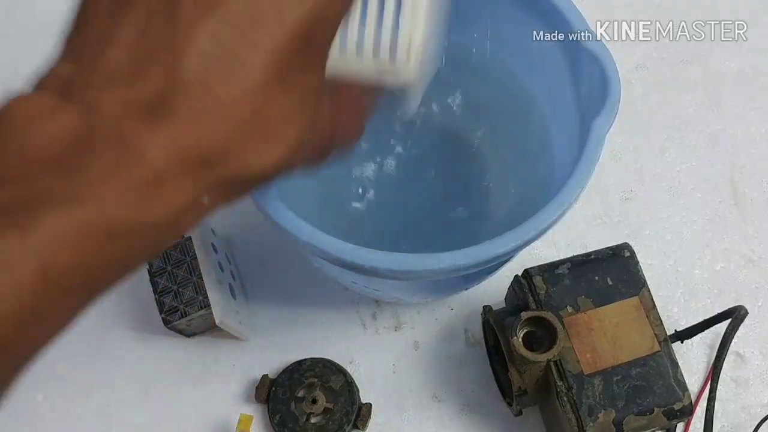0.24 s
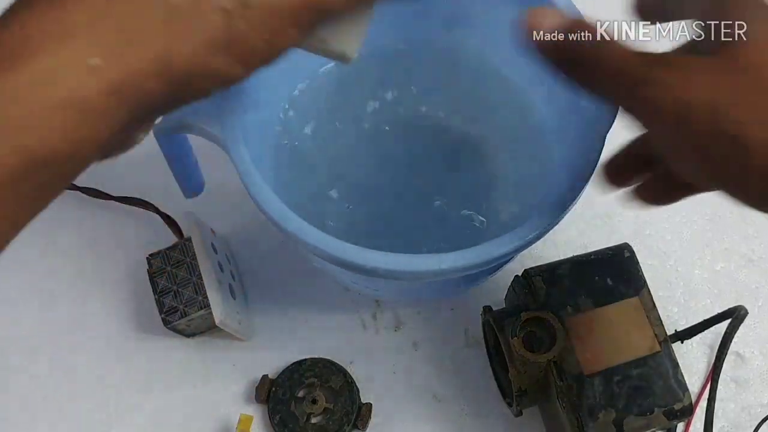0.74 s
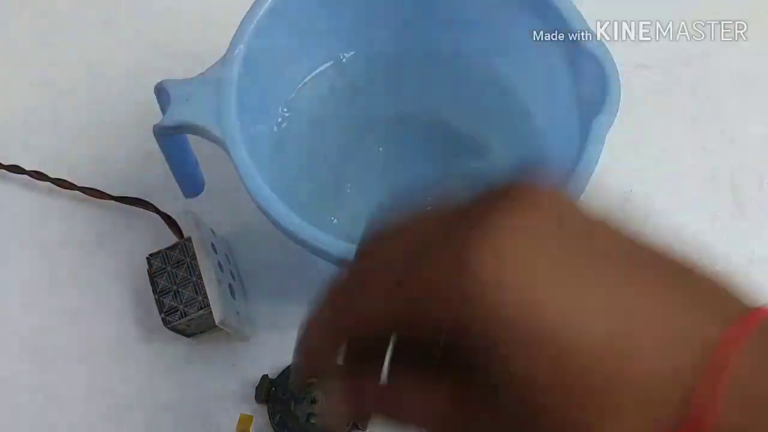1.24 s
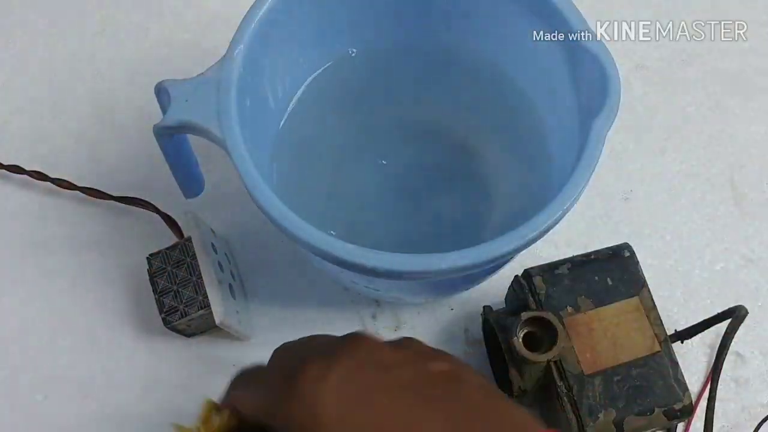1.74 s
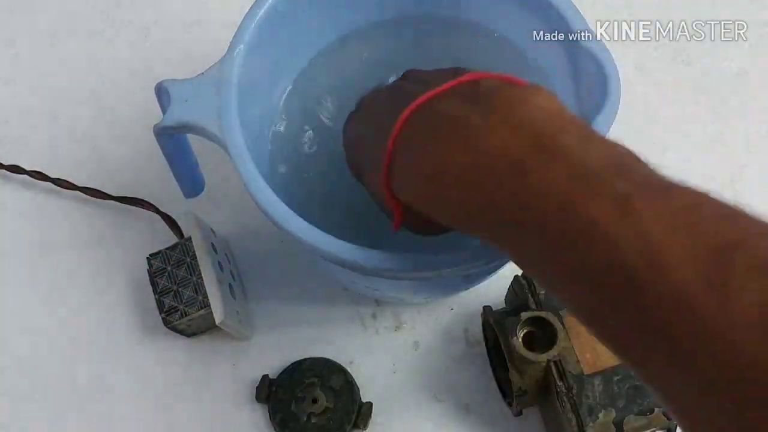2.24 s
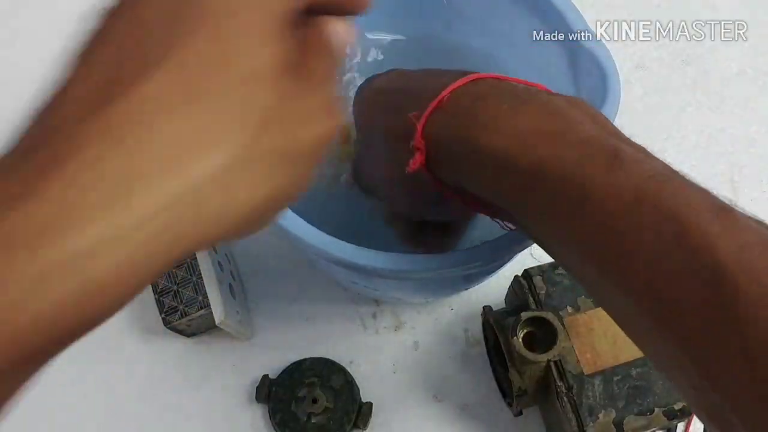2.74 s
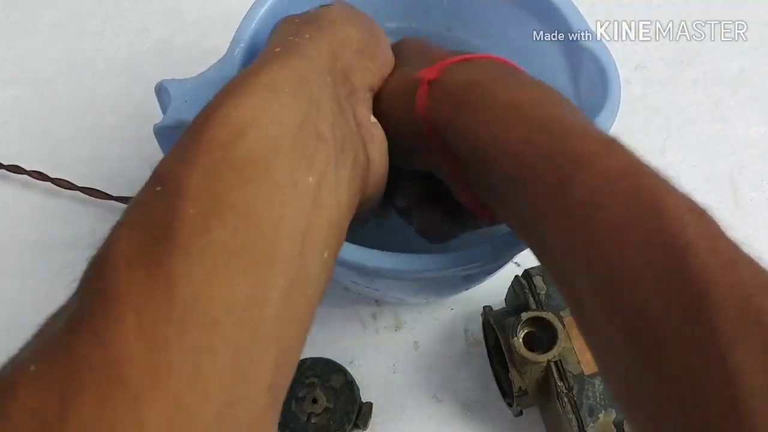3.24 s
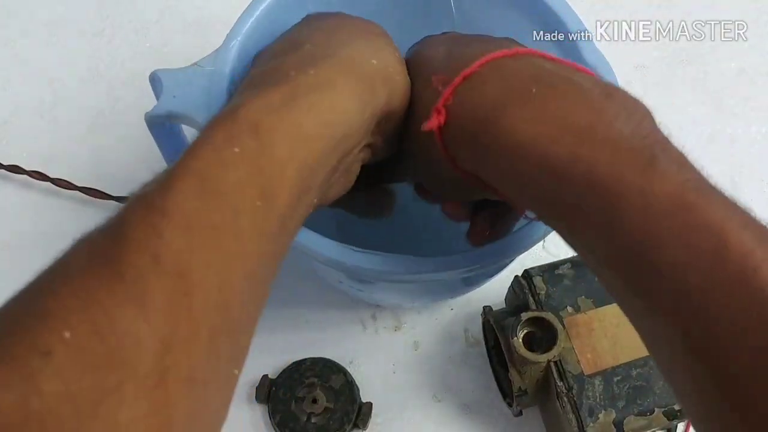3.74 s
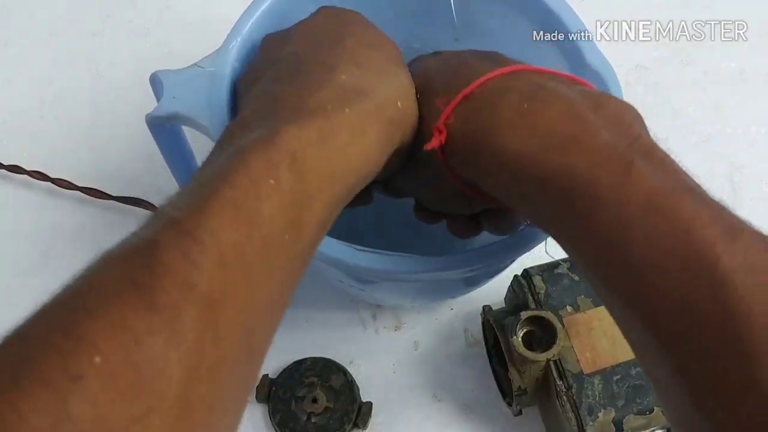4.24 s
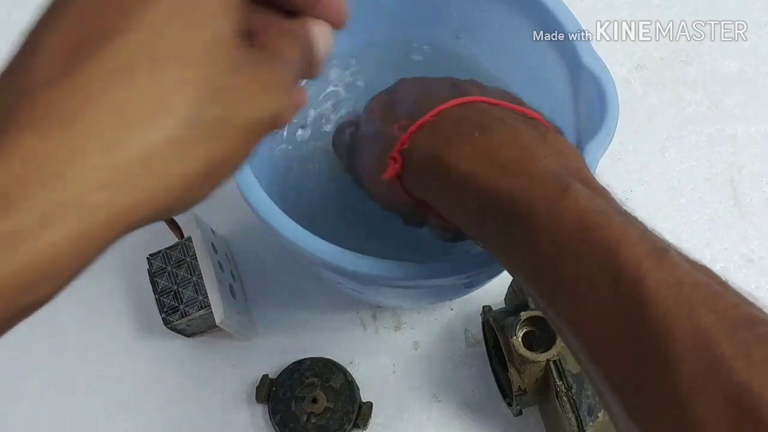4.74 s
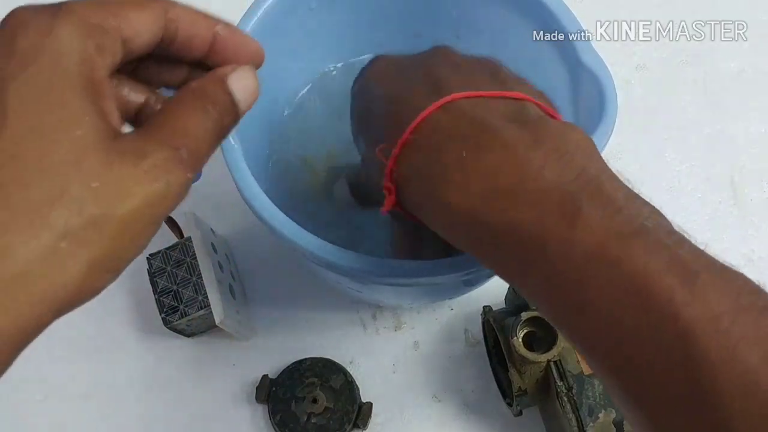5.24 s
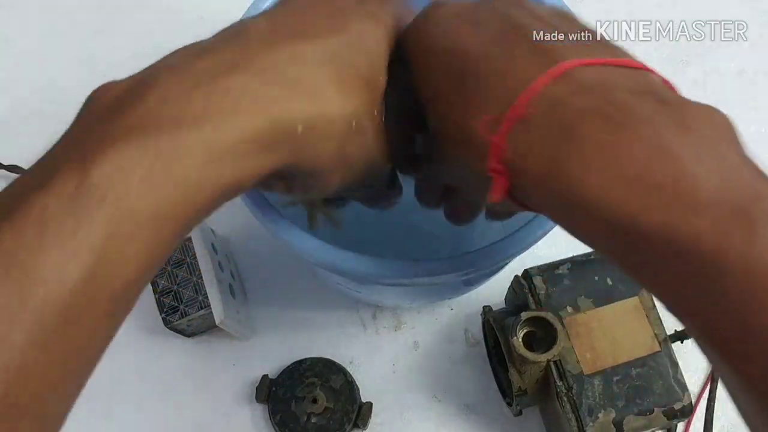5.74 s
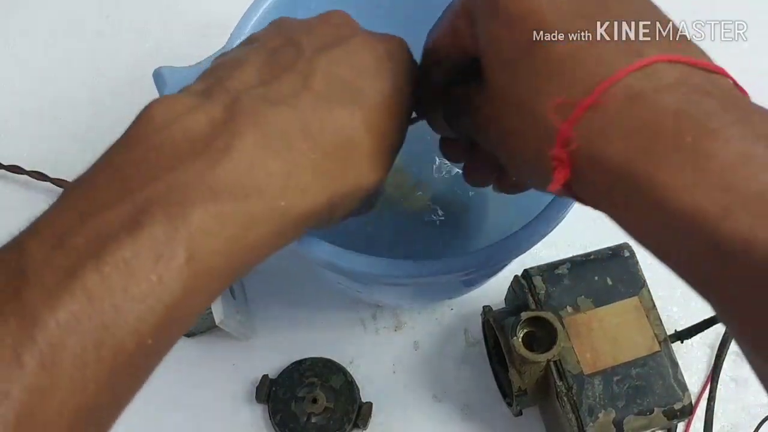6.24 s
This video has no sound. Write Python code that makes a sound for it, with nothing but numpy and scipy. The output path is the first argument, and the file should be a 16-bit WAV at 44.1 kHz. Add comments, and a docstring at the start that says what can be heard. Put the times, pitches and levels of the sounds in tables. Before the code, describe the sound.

Very close, hands wash small hard parts in a plastic jug of water on a table. A loud hollow knock with a plop comes almost at once, then quieter bumps, a sharp hard click, splashes and wet rubbing. Softer sloshing and dull bumps follow, then busier stirring with faint squeaks, and finally a cluster of loud resonant clunks. Bare quiet room, thin high insect chorus, phone just above.

```python
"""Hands rinse small parts in a plastic jug of water on a table; a phone just above hears with two ports.
Knocks ring the modes of jug, table and hard part; extra thuds deepen the table; weight shifts boom below.
Water slaps the wall in random bursts, froth chirps upward, drips, plops and single pitches out of knocks
ring as short wavering tones, wet skin hisses and squeaks.
Behind: a throbbing insect chorus outside, drifting room noise and the tail of bare walls."""
import sys
import numpy as np
from scipy import signal
from scipy.fft import rfft, irfft
from scipy.io import wavfile
from scipy.ndimage import uniform_filter1d

SR = 44100
rng = np.random.default_rng(int(sys.argv[2]) if len(sys.argv) > 2 else 0)


def store_wav(level_fs):
    """Save 16-bit WAV to argv[1]."""
    pcm = np.round(np.clip(np.atleast_2d(level_fs), -1, 1) * 32767)
    wavfile.write(sys.argv[1], SR, pcm.T.astype(np.int16))


N = 286650


def undb(db):
    """Decibels to amplitude."""
    return 10 ** (np.asarray(db) / 20)


def unit(x):
    """Scale to RMS 1."""
    return x / np.sqrt(np.mean(x ** 2))


def curve(table):
    """Columns of a table interpolated linearly through time."""
    time_s, *columns = np.transpose(table)
    return [np.interp(np.arange(N) / SR, time_s, column) for column in columns]


def band(x, lo_hz, hi_hz, order=2):
    """Butterworth band-pass."""
    return signal.sosfilt(signal.butter(order, [lo_hz, hi_hz], "band", fs=SR, output="sos"), x)


def hiss(lo_hz, hi_hz, size=N, order=2):
    """Band of white noise, RMS 1."""
    return unit(band(rng.standard_normal(size), lo_hz, hi_hz, order=order))


def walk(rate_hz):
    """Random levels, each held 1 / rate_hz and slewed; RMS 1."""
    hold = int(SR / rate_hz)
    steps = np.repeat(rng.standard_normal(N // hold + 1), hold)
    return unit(uniform_filter1d(steps, hold)[:N])


def add(track, time_s, sound):
    """Mix a sound into a track in place, cut at the end."""
    i = int(time_s * SR)
    track[i:i + len(sound)] += sound[:len(track) - i]


def blow(t, rise_s, t60_s):
    """Contact envelope: steep at first touch, swells for rise_s, then decays exponentially."""
    swell = np.sin(np.pi / 2 * np.minimum(t / rise_s, 1)) ** 0.76
    return swell * undb(-60 * np.maximum(t - rise_s, 0) / t60_s)


def near(modes, hz, db_per_octave):
    """Mode weights in dB, falling with distance from the struck spot's pitch."""
    return -db_per_octave * np.abs(np.log2(np.array(modes)[:, :1] / hz))


def ring(modes, weight_db, rise_s, t, spread=1.0):
    """One blow on damped modes, each with random detune, phase and strength; peak 1."""
    hz, db, t60_s = np.transpose(modes)[:, :, None]
    detune, phase, strength = spread * rng.standard_normal((3, len(modes), 1))
    sway = np.sin(2 * np.pi * hz * (1 + 0.0063 * detune) * t + 0.64 * phase)
    level = undb(db + weight_db + 2.0 * strength)
    y = np.sum(level * blow(t, rise_s, t60_s) * sway, axis=0)
    return y / np.max(np.abs(y))


def alike(hz, size):
    """Two noises: nearly the same at both ports in the bass, unrelated in the treble."""
    mid, side = rng.standard_normal((2, size))
    share = np.clip((hz / 840.0) ** 1.7, .15, 1)
    return (mid + share * side * np.array([[1], [-1]])) / np.sqrt(1 + share ** 2)


# room noise spectrum: (frequency [Hz], relative density [dB per Hz])
AIR_SPECTRUM = [(15, -33), (25, 0), (81, -7), (197, 2.5), (271, -20), (679, -7.5), (1450, -25), (1700, -33),
                (2690, -18.5), (6000, -21), (7800, -50), (13200, -120)]
AIR_DB = -63


def air():
    """Quiet room: half-octave noise bands whose levels drift."""
    spectrum_hz, spectrum_db = np.transpose(AIR_SPECTRUM)
    out = 0
    for hz in 42 * 2 ** np.arange(0, 8, .5):
        db = np.interp(np.log(hz), np.log(spectrum_hz), spectrum_db) + 2.0 * walk(9.9)
        out = out + undb(db) * band(alike(hz, size=N), hz / 1.1, hz * 1.194)
    return unit(out) * undb(AIR_DB)


# insect song bands: (centre [Hz], width [Hz], relative level [dB])
CHORUS_BANDS = [(7214, 217, 2.5), (6820, 250, -9.5)]
INSECTS_DB = -60.5


def insects():
    """Distant chorus: narrow noise bands that throb together unevenly."""
    song = 0
    for hz, width_hz, db in CHORUS_BANDS:
        song = song + undb(db) * hiss(hz - width_hz / 2, hz + width_hz / 2, size=(2, N))
    return song * undb(INSECTS_DB + 1.2 * walk(25))


# bare-wall tail bands: (centre [Hz], t60 [s], relative level [dB])
WALL_BANDS = [(145.5, 0.87, -3), (382, 0.48, 2.5), (789, 0.36, 4.5), (1760, 0.58, 3), (3670, 0.45, -0.5),
              (8460, 0.48, -8.5)]
ROOM_DB = -35.0


def room(x):
    """Bare walls: dense noise tail with a fast build-up and a decay time per band."""
    t = np.arange(SR) / SR
    tail = 0
    for hz, t60_s, db in WALL_BANDS:
        tail = tail + undb(db - 60 * t / t60_s) * band(alike(hz, size=SR), hz / 1.63, hz * 1.562)
    tail = undb(ROOM_DB) * tail * (1 - np.exp(-t / 0.0013))
    return signal.fftconvolve(x[None], tail, axes=1)[:, :N]


# table legs and floor modes: (frequency [Hz], relative level [dB], t60 [s])
FLOOR_MODES = [(58.83, 0.5, 1.5), (76.35, -2.5, 1.3)]
# weight shifts on the table top: (time [s], peak level [dB], favoured pitch [Hz])
WEIGHT_SHIFTS = [(0.275, -28.5, 64), (1.485, -39.5, 75.4), (2.437, -50, 78.1), (3.126, -35.5, 70),
                 (3.663, -55.5, 75.4), (4.028, -48, 80.7), (4.298, -51, 53.8), (4.701, -52.5, 75.4),
                 (6.073, -45, 66.4)]
HUM_DB = -63


def boom():
    """Slow low modes: struck by weight shifts, over a steady narrow-band hum."""
    out, t = 0, np.arange(SR) / SR
    for hz, _, t60_s in FLOOR_MODES:
        out = out + undb(HUM_DB) * hiss(hz - 4 / t60_s, hz + 4 / t60_s, order=1)
    for time_s, db, hz in WEIGHT_SHIFTS:
        thump = ring(FLOOR_MODES, near(FLOOR_MODES, hz, 36), 0.071, t, spread=0.27)
        add(out, time_s, undb(db) * thump)
    return np.array([out, np.roll(out, shift=30)])  # the table shakes one end of the phone first


# wet skin rubbing: (start [s], end [s], level per band [dB], fade [s])
SKIN_RUBS = [(.3, 0.542, -63, 0.055), (1.49, 2.35, -54.5, 0.041), (3.628, 3.758, -52, 0.043),
             (4.748, 5.5, -63, 0.52)]
# spray flicked off wet fingers: (time [s], level [dB], t60 [s], lower band re top [dB])
SPRAY_FLICKS = [(0.0388, -51.5, 0.096, 2), (0.269, -41, 0.34, 1.5), (0.3606, -33.5, 0.34, -2.5),
                (0.5633, -52, 0.16, -9), (0.6385, -53.5, 0.18, -4), (0.8016, -50, 0.077, 8.5),
                (1.487, -59, 0.21, 6.5), (1.522, -35, 0.4, 1.5), (1.635, -40.5, 0.18, 1.5),
                (1.942, -35.5, 0.16, 0), (2.164, -37.5, 0.21, -2), (2.245, -48, 0.49, 5.5),
                (2.285, -39.5, 0.13, 7), (2.499, -57, 0.023, -21), (2.559, -54, 0.22, -6),
                (2.613, -49.5, 0.11, -7), (2.77, -58, 0.033, -13), (2.8245, -59, 0.03, -24),
                (2.927, -58.5, 0.43, 9), (3.015, -58, 0.03, -10), (3.1532, -56.5, 0.68, 2),
                (3.33, -51, 0.23, -3), (3.661, -49.5, 0.3, 6.5), (3.72, -46, 0.094, -24),
                (3.918, -48, 0.059, -13), (3.9376, -43.5, 0.11, -7), (4.005, -56, .03, -12),
                (4.067, -52.5, 0.055, -0.5), (4.58, -48.5, 0.22, 2.5), (4.866, -47.5, 0.1, -6),
                (5.314, -49, 0.18, -0.5), (5.927, -59, 0.081, -5), (6.0804, -46, 0.13, 6),
                (6.124, -56.5, 0.29, 24)]
SNAP_DB, SNAP_S = 5, 0.003  # extra level at a flick's onset, and its decay
HISS_DB, HISS_LOW_DB = -69.5, -72  # steady hiss: treble, below


def swish():
    """Rubs are smooth noise, flicks are bursts of spiky noise; each port hears its own noise."""
    top, under, rubs, t = np.zeros(N), np.zeros(N), np.zeros(N), np.arange(N) / SR
    for start_s, end_s, db, fade_s in SKIN_RUBS:
        fade = np.clip(np.minimum(t - start_s, end_s - t) / fade_s + .5, 0, 1)
        rubs = rubs + undb(db) * fade ** 2
    t = t[:SR // 2]
    for time_s, db, t60_s, low_db in SPRAY_FLICKS:
        decay = undb(db - 60 * t / t60_s + SNAP_DB * np.exp(-t / SNAP_S))
        flare = decay * (1 - np.exp(-t / (0.0023 * t60_s)))
        add(top, time_s, flare)
        add(under, time_s, undb(low_db) * flare)
    spikes_db = 2.0 * rng.exponential(size=N) + 0.78 * walk(54)
    spray = rng.standard_normal((2, N)) * undb(spikes_db)
    flicks = top * unit(band(spray, 8700, 12000)) + under * unit(band(spray, 1300, 6000))
    rush = hiss(8800, 14000, size=(2, N), order=3) + hiss(1500, 6500, size=(2, N))
    steady = undb(HISS_DB) * hiss(9400, 14000, size=(2, N))
    steady = steady + undb(HISS_LOW_DB) * hiss(1500, 8000, size=(2, N))
    return flicks + rubs * rush * undb(1.5 * walk(15)) + steady


# wet skin on plastic: (start [s], end [s], start pitch [Hz], end pitch [Hz], level [dB], shiver [share])
SKIN_SQUEAKS = [(4.76, 5.34, 3320, 3230, -59, .018), (4.62, 5.08, 5600, 5400, -61, .04),
                (5.55, 5.635, 5600, 3900, -55, .08)]


def squeaks():
    """Stick and slip: a gliding tone with shivering pitch and fluttering level."""
    out = np.zeros(N)
    for start_s, end_s, start_hz, end_hz, db, rough in SKIN_SQUEAKS:
        n = int((end_s - start_s) * SR)
        shiver, flutter_db = rough * walk(900)[:n], 4 * walk(120)[:n]
        swell = np.sin(np.pi * np.linspace(0, 1, n) ** .75)
        turns = np.cumsum(np.linspace(start_hz, end_hz, n) * (1 + shiver)) / SR
        add(out, start_s, undb(db + flutter_db) * swell * np.sin(2 * np.pi * turns))
    return out


# drips, plops and single pitches out of knocks: (time [s], starting pitch [Hz], level [dB], t60 [s])
SHORT_TONES = [(0.0415, 1996, -32.5, 0.07), (.0415, 928, -40, 0.066), (.271, 854, -8.5, 0.075),
               (.273, 1264, -11.5, 0.047), (.285, 337.4, -17, 0.21), (.198, 925, -51, 0.068),
               (.802, 859, -24.5, 0.087), (1.484, 305, -33.5, 0.062), (1.553, 250, -18.5, 0.1),
               (1.551, 500, -19.5, 0.11), (1.552, 805, -23, 0.068), (1.632, 455.6, -25, 0.19),
               (1.672, 430, -20, 0.072), (2.216, 1330, -27.5, 0.048), (2.217, 887, -32, 0.12),
               (2.247, 2270, -36, 0.034), (2.258, 2110, -25, 0.041), (2.274, 2370, -24, 0.021),
               (2.278, 297, -20, 0.16), (2.292, 2940, -28, 0.034), (2.424, 5500, -41, 0.0095),
               (2.43, 303, -35, 0.37), (2.435, 1200, -31, 0.042), (2.535, 3120, -51, 0.045),
               (2.575, 1510, -43, 0.029), (2.607, 3510, -40, 0.028), (2.617, 4880, -26, 0.009),
               (2.617, 5700, -24, 0.0082), (2.705, 877, -39, 0.095), (2.738, 1650, -52, 0.075),
               (2.782, 908, -46.5, 0.092), (2.888, 890, -46, 0.08), (2.916, 1550, -48, .03),
               (2.998, 870, -28, 0.06), (3.125, 2860, -46, 0.034), (3.352, 510, -50, 0.061),
               (3.456, 830, -20.5, 0.032), (3.938, 2390, -40, 0.042), (4.018, 4280, -40, 0.027),
               (4.037, 3550, -40, .015), (4.037, 4970, -39, .015), (4.069, 5460, -33, 0.014),
               (4.049, 1206, -47.5, 0.054), (4.319, 2820, -45, 0.027), (4.563, 668, -20, 0.068),
               (4.568, 845, -6.5, 0.057), (4.89, 3830, -46, .03), (4.966, 3880, -43, .025),
               (4.966, 2200, -25, 0.016), (4.966, 1200, -19.5, 0.043), (4.968, 835, -32, 0.035),
               (5.138, 854, -29, 0.048), (5.222, 867, -23, 0.13), (5.515, 920, -30.5, 0.023),
               (5.612, 843, -37, 0.037), (5.85, 847, -18, 0.034), (5.993, 1553, -29.5, 0.071),
               (6.08, 887, -4.5, 0.073), (6.127, 1215, -13, 0.06), (6.128, 1524, -13.5, 0.055),
               (6.127, 722, -2, 0.11), (6.132, 429, -2.5, 0.095)]
WOBBLE = 0.02  # RMS pitch waver [share]


def short_tones():
    """Short wavering tones creeping upward: drips, plops and single pitches ringing out of knocks."""
    out, t, waver = np.zeros(N), np.arange(SR // 5) / SR, WOBBLE * walk(200)
    for time_s, hz, db, t60_s in SHORT_TONES:
        local_waver = np.roll(waver, -int(time_s * SR))[:len(t)]
        turns = hz * np.cumsum(1 + 0.74 * t + local_waver) / SR
        envelope = undb(db - 60 * t / t60_s) * (1 - np.exp(-t / 0.0012))
        add(out, time_s, envelope * np.sin(2 * np.pi * turns))
    return out


# hands stirring: (time [s], slop level [dB], froth level [dB])
STIRRING = [(0, -101, -79), (2.95, -76, -79), (3.13, -52.5, -59.5), (3.8, -83.5, -92), (4.0, -61.5, -71),
            (4.2, -63.5, -81), (4.55, -73, -93), (4.8, -51, -61.5), (4.98, -47.5, -50), (5.12, -58, -67.5),
            (5.27, -56, -78), (5.61, -67.5, -78), (5.85, -48.5, -81.5), (6.5, -64, -80)]
# where water slaps the wall: (favoured pitch [Hz], relative level [dB])
SLAP_SPOTS = [(330, 3.5), (450, -1), (600, 0.5), (850, -2), (1200, -13.5)]
SPOT_SCATTER = 0.051  # detuning of the wall by tilting water [share]
FROTH_LO_HZ, FROTH_HI_HZ, FROTH_PER_S, FROTH_T60_S = 1060, 2700, 420, 0.012
# water motion after every knock, re the knock's level
AFTERSLOP_DB, AFTERFROTH_DB, AFTERSLOP_RISE_S, AFTERSLOP_T60_S = -28, -54.5, 0.082, 0.66


def slop():
    """Random small slaps ring damped wall modes; random small bubbles burst as rising chirps."""
    slosh, froth, t = 0, 0, np.arange(SR // 8) / SR
    for spot_hz, spot_db in SLAP_SPOTS:
        for detune in 1 + SPOT_SCATTER * np.arange(-1, 2):
            slaps = (rng.random(N) < 5 / SR) * undb(spot_db + 5.6 * rng.standard_normal(N))
            wall = np.array(JUG_MODES) * [detune, 1, .4]  # shorter decay than a knock
            body = ring(wall, near(JUG_MODES, spot_hz, 14.0), 0.0035, t, spread=0.82)
            slosh = slosh + signal.fftconvolve(slaps, body)[:N]
    for hz in np.geomspace(FROTH_LO_HZ, FROTH_HI_HZ, num=12):
        burst_db = -6.0 * np.log2(hz / FROTH_LO_HZ) + 5.3 * rng.standard_normal(N)
        bursts = (rng.random(N) < FROTH_PER_S / 12 / SR) * undb(burst_db)
        bubble = undb(-60 * t / FROTH_T60_S) * np.sin(2 * np.pi * hz * t * (1 + 5.4 * t))
        froth = froth + signal.fftconvolve(bursts, bubble)[:N]
    motion, foam = undb(curve(STIRRING))
    after, t = np.zeros(N), np.arange(SR) / SR
    for time_s, db, *_ in JUG_KNOCKS:
        add(after, time_s, undb(db) * blow(t, AFTERSLOP_RISE_S, AFTERSLOP_T60_S))
    slosh = unit(slosh) * (motion + undb(AFTERSLOP_DB) * after)
    return slosh + unit(froth) * (foam + undb(AFTERFROTH_DB) * after)


# table top modes: (frequency [Hz], relative level [dB], t60 [s])
TABLE_MODES = [(155, -2, 0.3), (223, 4.5, 0.24), (264.5, -4.5, 0.24)]
# extra table thuds: (time [s], peak level [dB])
TABLE_THUDS = [(0.275, -21.5), (0.831, -42), (1.484, -33.5), (3.333, -37), (4.62, -31.5), (5.06, -41)]


def table_thuds():
    """Extra low thud of the table modes, mostly under knocks."""
    out, t = np.zeros(N), np.arange(SR // 3) / SR
    for time_s, db in TABLE_THUDS:
        add(out, time_s, undb(db) * ring(TABLE_MODES, 0, 0.0044, t))
    return out


# jug wall and the air over the water: (frequency [Hz], relative level [dB], t60 [s])
JUG_MODES = [(282.5, 0.5, 0.062), (351.8, -2, 0.097), (438, -2.5, 0.073), (480.1, 3, 0.051),
             (561.1, 2.5, 0.1), (622, 3, 0.06), (697.6, 0.5, 0.051), (738, -2, 0.046), (818.7, 2.5, 0.062),
             (877, 1, 0.094), (915, 3.5, 0.031), (1032, -2.5, 0.033), (1207, -0.5, 0.027),
             (1327, -5, 0.047), (1554, -7, 0.039), (1760, -14.5, 0.034)]
# hard part modes: (frequency [Hz], relative level [dB], t60 [s])
PART_MODES = [(2110, -17, 0.015), (2283, -10.5, 0.015), (2700, -6.5, 0.02), (2940, -5.5, 0.025),
              (3230, -0.5, 0.02), (3377, 8, 0.0097), (3576, 2.5, 0.03), (3740, 3, 0.035),
              (3880, -6.5, .018), (4660, -13, 0.045)]
# knocks and slaps: (time [s], jug peak level [dB], favoured pitch [Hz], contact [ms], hard part re jug [dB])
JUG_KNOCKS = [(0.042, -40, 810, 1.1, -19), (0.2705, -1.5, 710, 2.6, -12), (0.635, -34.5, 520, 3.2, -33),
              (0.8025, -31, 358, 9.3, -13), (0.875, -36.5, 760, 3.9, -23), (1.175, -45.5, 592, 2.6, -21),
              (1.484, -24.5, 307, 12, -32.5), (1.495, -24.5, 587, 32, -35), (1.54, -14, 506, 11, -52),
              (1.623, -20.5, 404, 18, -44), (1.664, -27.5, 440, 13, -25.5), (1.9432, -24.5, 594, 1.26, 11),
              (1.9475, -41, 580, 1.7, 21), (2.109, -27, 560, 1.94, -12), (2.216, -26.5, 920, 6.1, -19),
              (2.273, -10, 510, 6.2, -28.5), (2.284, -22.5, 398, 4.9, -35), (2.43, -36.5, 800, 6.7, -43),
              (2.705, -43.5, 850, 3.8, -7.5), (2.93, -32.5, 830, 4, -4), (2.98, -33, 805, 17, -42),
              (3.142, -32, 540, 34, -34), (3.202, -29.5, 480, 3.1, -46), (3.333, -25, 465, 23.3, -35),
              (3.456, -31, 660, 3.3, -28), (3.643, -27.5, 530, 31.5, -24.5), (3.696, -33.5, 610, 2.5, -9),
              (3.938, -36.5, 594, 29, -21), (4.13, -35.5, 850, 3.7, -22), (4.222, -40, 770, 18, -17),
              (4.306, -35, 750, 4.5, -18.5), (4.322, -28, 417, 12, -41), (4.38, -32.5, 447, 19, -37),
              (4.462, -28, 606, 2.9, -33), (4.56, -14.5, 665, 8.3, -39.5), (4.615, -17.5, 696, 26, -36),
              (4.837, -27.5, 260, 1.6, -27), (4.886, -27.5, 830, 15, -26), (4.959, -21, 950, 13, -46),
              (5.04, -22, 660, 2, -47), (5.137, -27.5, 785, 1.6, -39), (5.22, -32.5, 846, 10, -46),
              (5.305, -24, 800, 3.7, -38), (5.335, -30.5, 590, 16, -28), (5.406, -30, 420, 6.4, -29),
              (5.849, -29.5, 840, 3.5, -12), (5.952, -34, 900, 2.2, -15), (5.991, -21.5, 790, 2.3, -30.5),
              (6.074, -10, 980, 7.7, -30.5), (6.126, 1.5, 594, 1.46, -22), (6.18, -10, 440, 10, -35),
              (6.219, -19, 607, 2.8, -11.5), (6.463, -24.5, 770, 1.7, -37)]
FOCUS_DB_PER_OCTAVE = 9.5  # how narrowly a knock picks jug modes
THUD_DB, THUD_DB_PER_OCTAVE, THUD_HZ = -24, -4, 608  # low knocks shake the table more
CLACK_DB, CLACK_PER_TICK = -9, 0.56  # harder part strike, louder clack
RING_PER_TICK = 0.86  # only a sharp strike makes the part ring clear


def knocks():
    """The jug rings, the table thuds, the contact clacks in noise and the hard part ticks."""
    out, t = np.zeros(N), np.arange(SR // 4) / SR
    for time_s, db, hz, contact_ms, tick_db in JUG_KNOCKS:
        rise_s = contact_ms / 1000
        jug = ring(JUG_MODES, near(JUG_MODES, hz, FOCUS_DB_PER_OCTAVE), rise_s, t)
        thud_db = THUD_DB + THUD_DB_PER_OCTAVE * np.log2(hz / THUD_HZ)
        thud = undb(thud_db) * ring(TABLE_MODES, 0, rise_s + 0.009, t)
        clack = blow(t, 0.39 * rise_s, 0.077) * hiss(1000, 3200, size=len(t))
        clack = undb(CLACK_DB + CLACK_PER_TICK * tick_db) * clack
        crack = undb(-2.5) * blow(t, 1.01 * rise_s, 0.0031) * hiss(2600, 4270, size=len(t))
        part = undb(RING_PER_TICK * min(tick_db, 0)) * ring(PART_MODES, 0, 0.96 * rise_s, t)
        add(out, time_s, undb(db) * (jug + thud + clack + undb(tick_db) * (part + crack)))
    return out


def scene():
    """Near sources reach both ports directly and through the room; the rest are stereo layers."""
    background = air() + insects() + boom() + swish()
    jug, slosh, tones = knocks() + table_thuds(), slop(), short_tones() + squeaks()
    close = jug + slosh + tones
    direct = np.array([close, np.roll(close, shift=3)])  # ports a finger apart
    # water sounds inside the jug: other paths to the walls; short tones and squeaks reach them less
    return direct + room(jug) + room(slosh + undb(-5.0) * tones) + background


# right port re left: (frequency [Hz], gain [dB])
PORT_RESPONSE = [(5000, 0), (7200, 10.5), (8300, 3.5), (9500, -14.5), (15000, 0.5)]
TOP_HZ = 15800


def record(dry):
    """The right port is coloured; the phone rounds the loudest peaks and cuts the top."""
    colour = undb(np.interp(np.fft.rfftfreq(N, 1 / SR), *np.transpose(PORT_RESPONSE)))
    ports = np.array([dry[0], irfft(rfft(dry[1]) * colour, N)])
    rounded = np.tanh(0.73 * ports) / 0.92
    return signal.sosfilt(signal.ellip(8, .2, 70, TOP_HZ, fs=SR, output="sos"), rounded)


dry = scene()
out = record(dry)
store_wav(out)
```